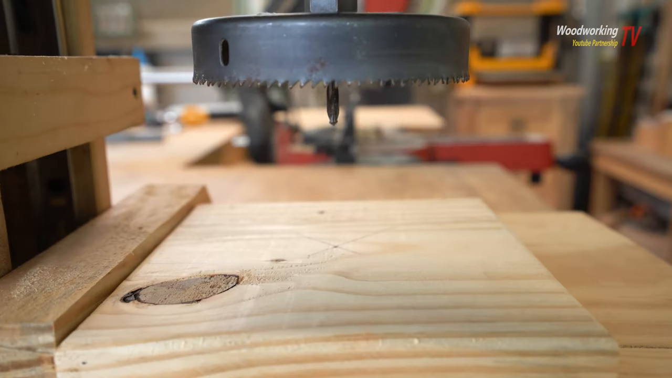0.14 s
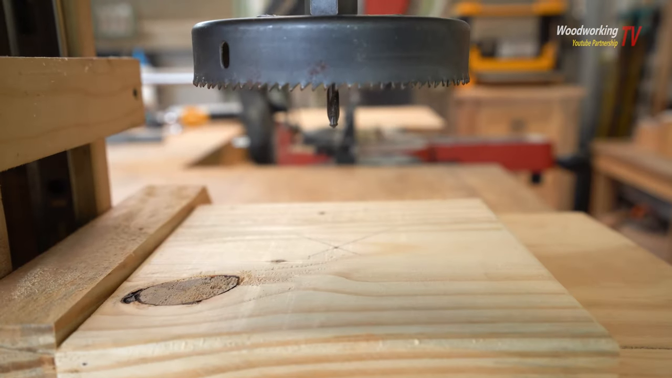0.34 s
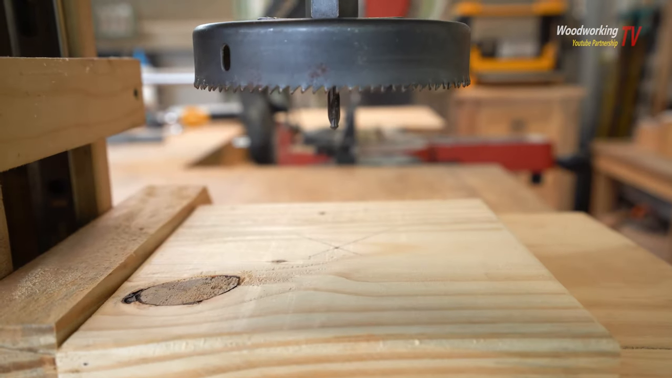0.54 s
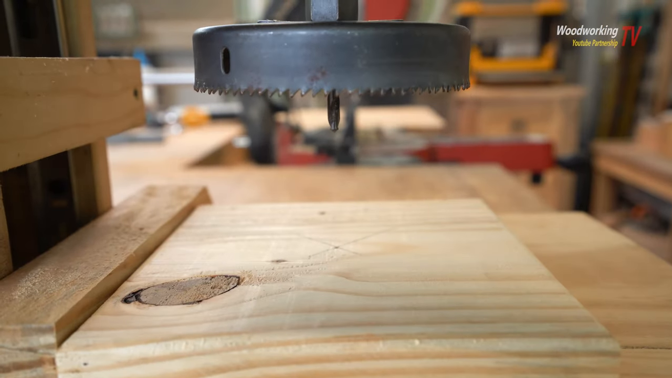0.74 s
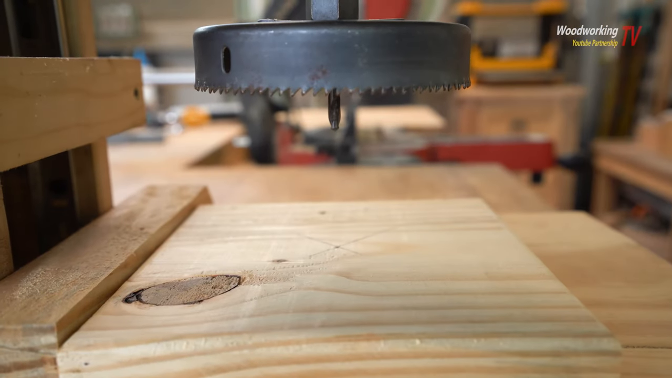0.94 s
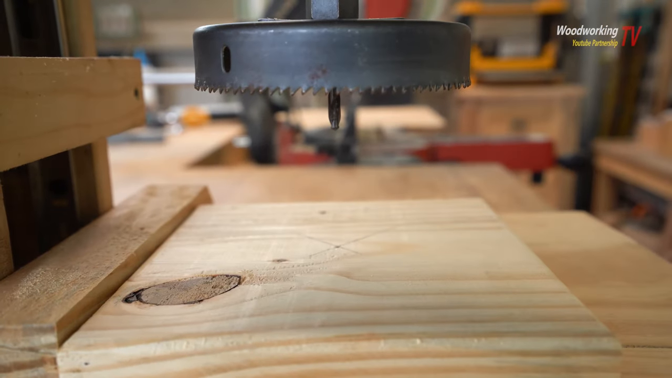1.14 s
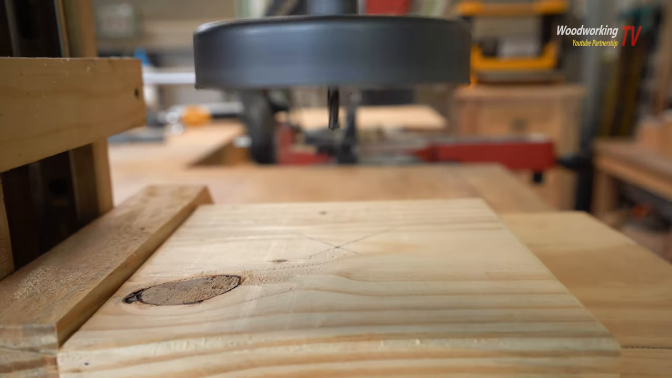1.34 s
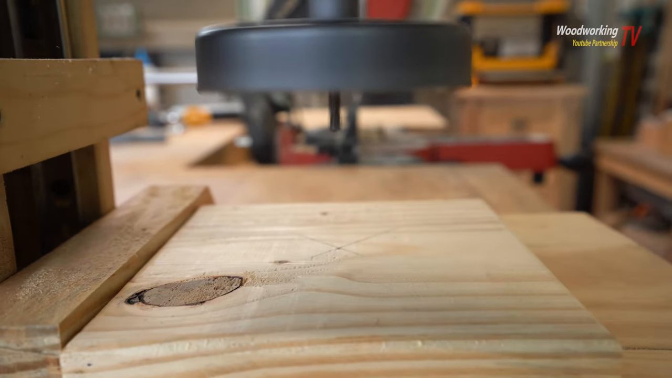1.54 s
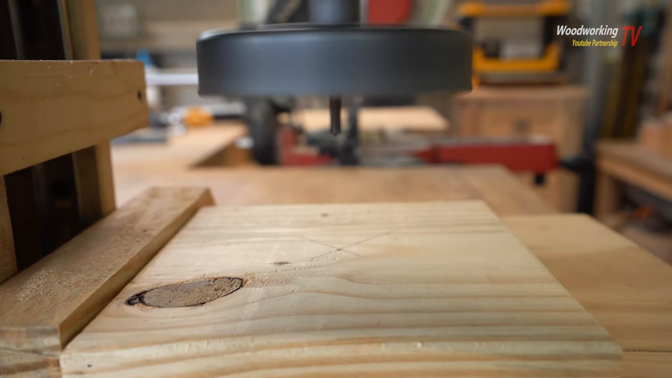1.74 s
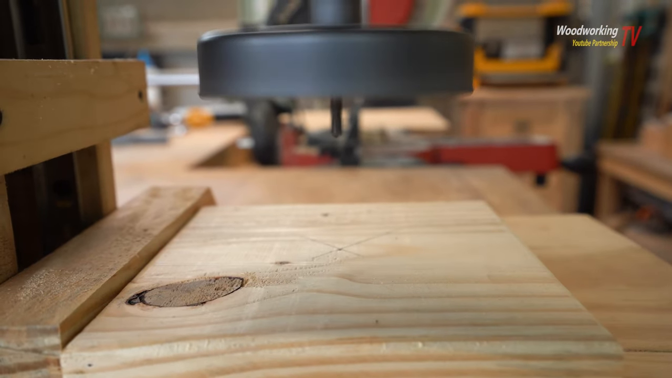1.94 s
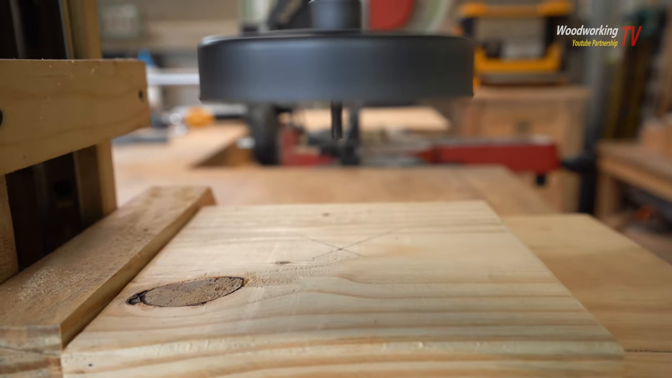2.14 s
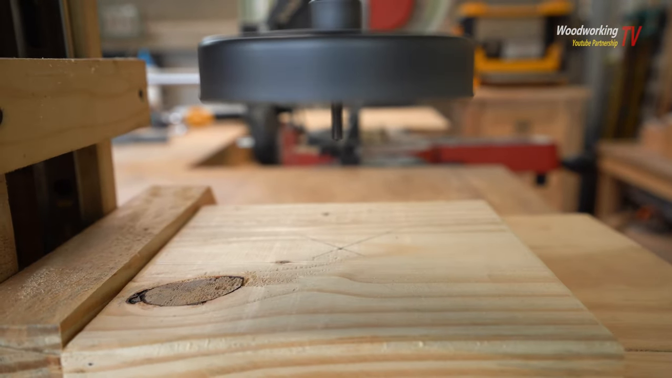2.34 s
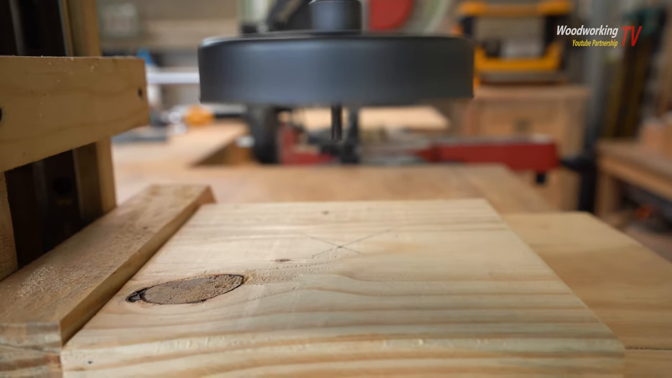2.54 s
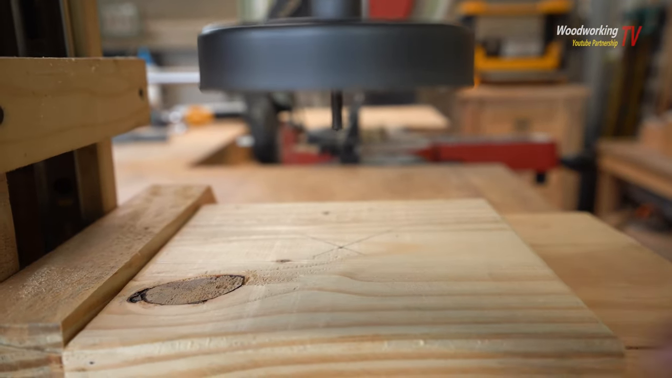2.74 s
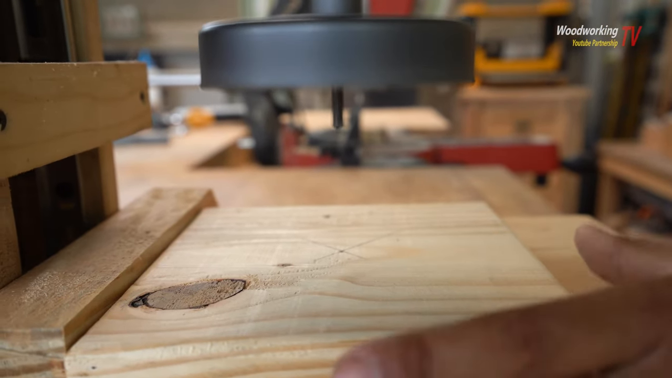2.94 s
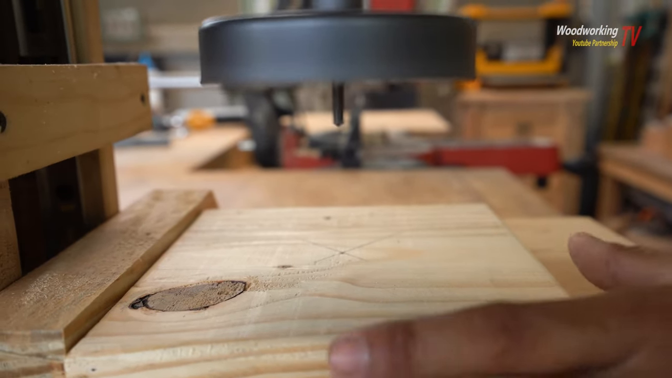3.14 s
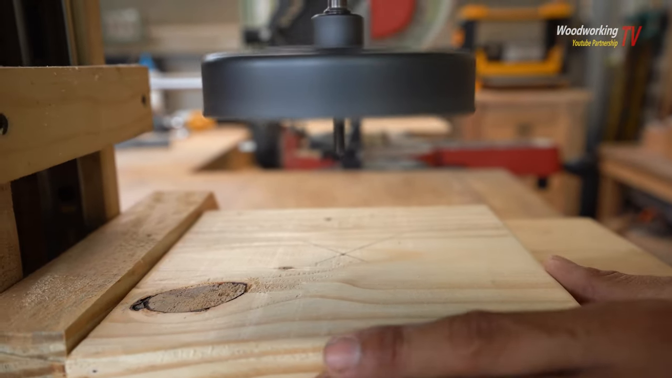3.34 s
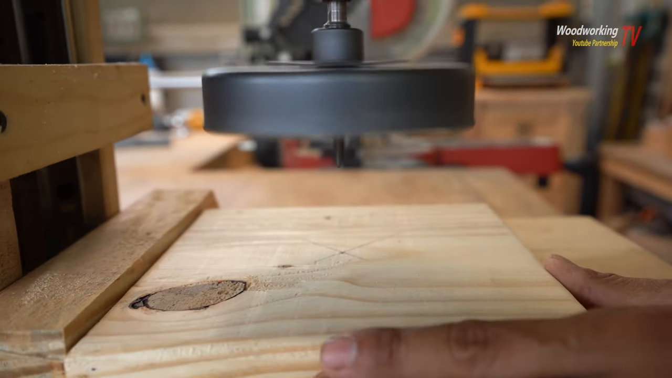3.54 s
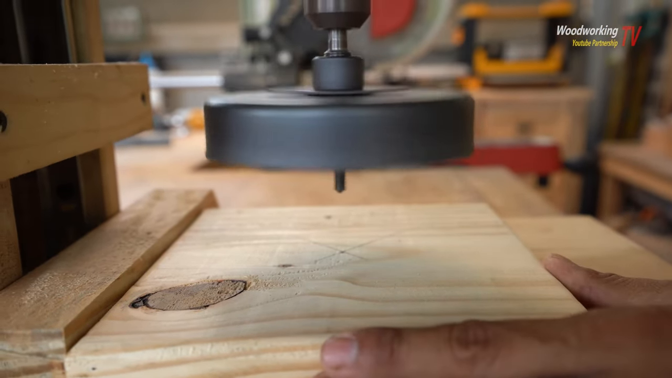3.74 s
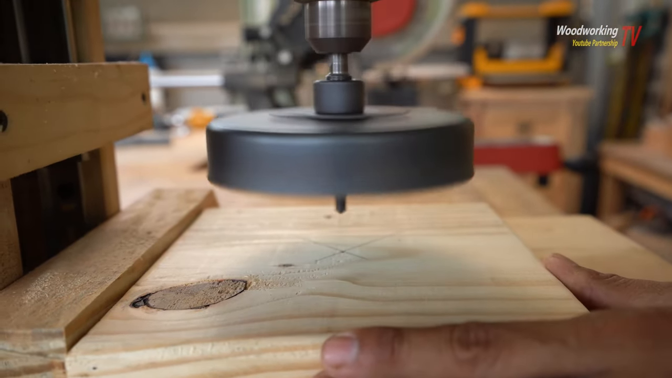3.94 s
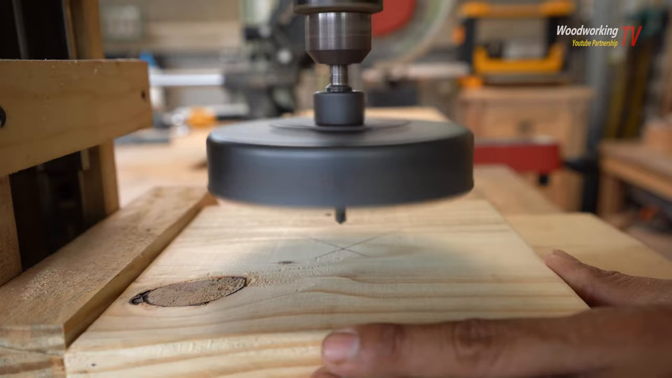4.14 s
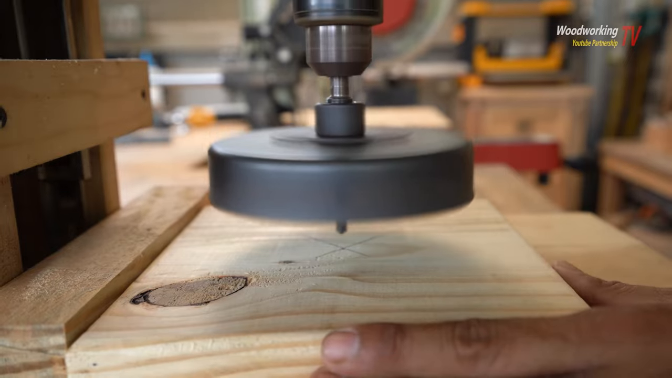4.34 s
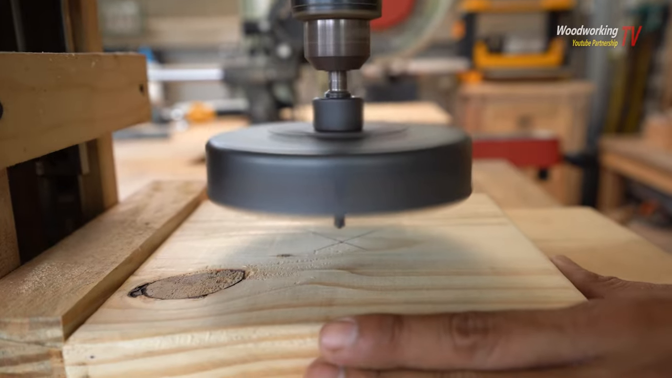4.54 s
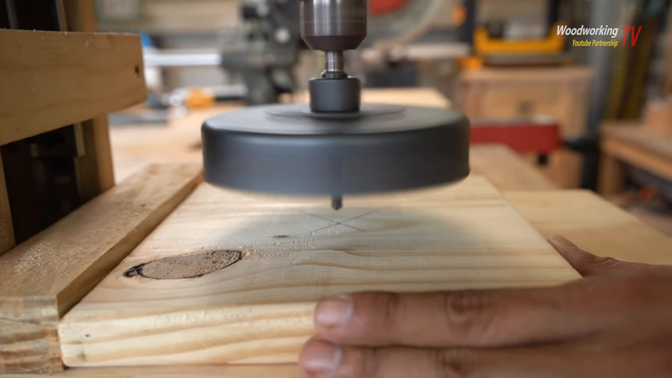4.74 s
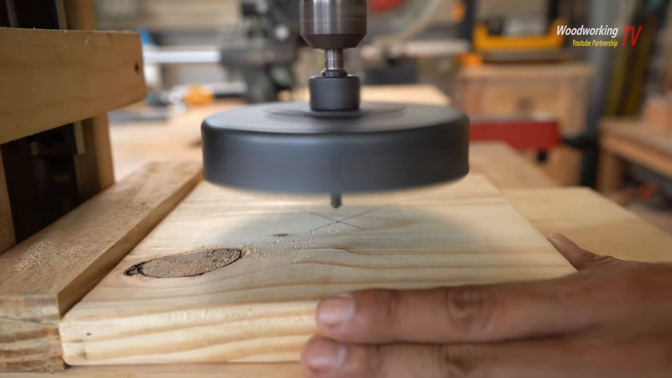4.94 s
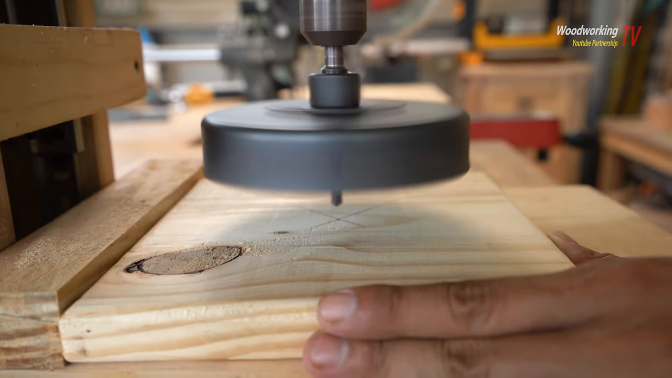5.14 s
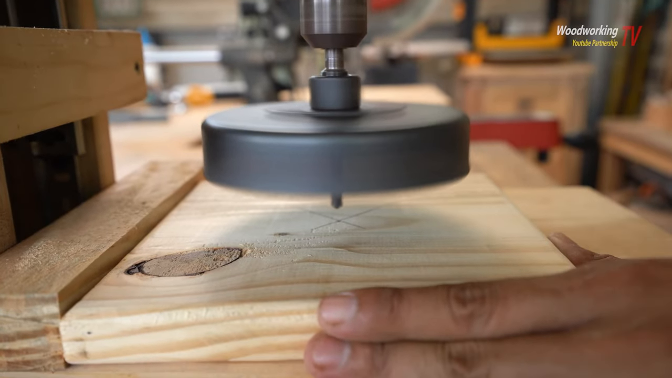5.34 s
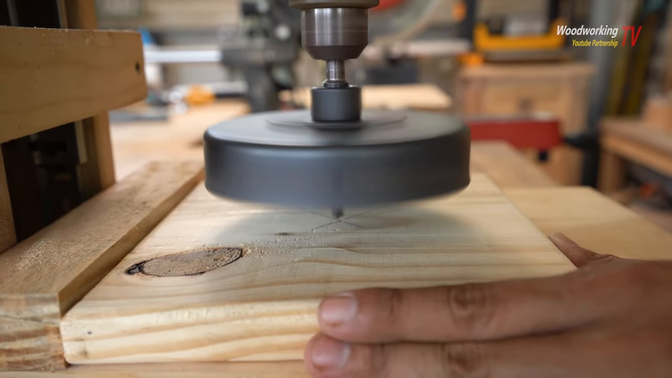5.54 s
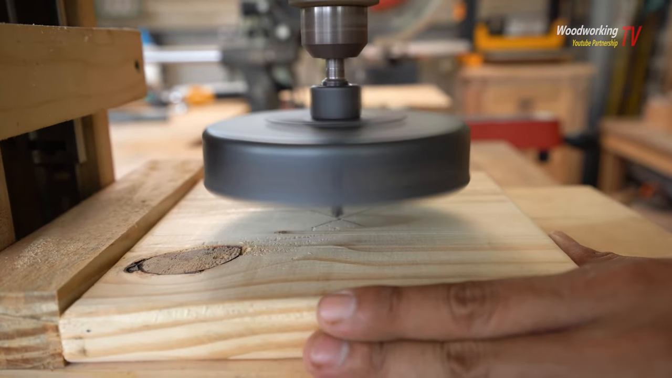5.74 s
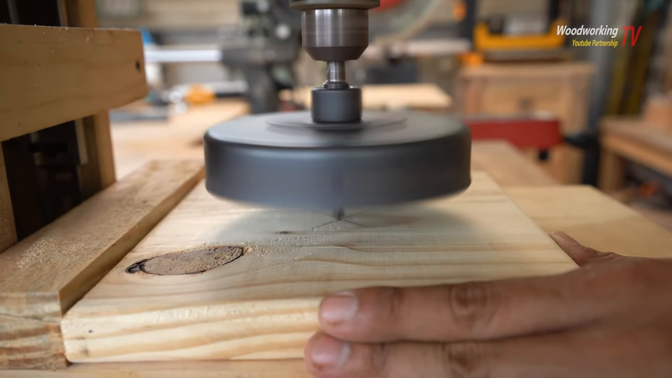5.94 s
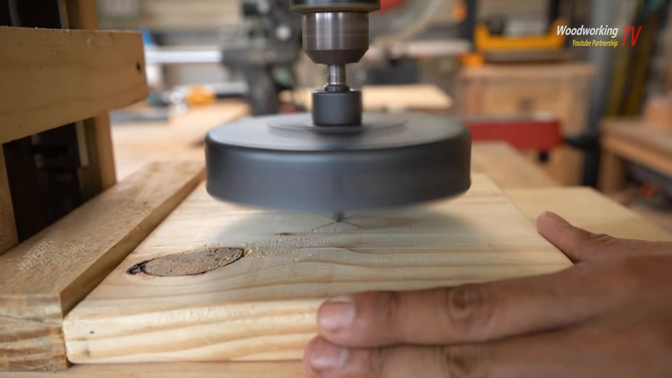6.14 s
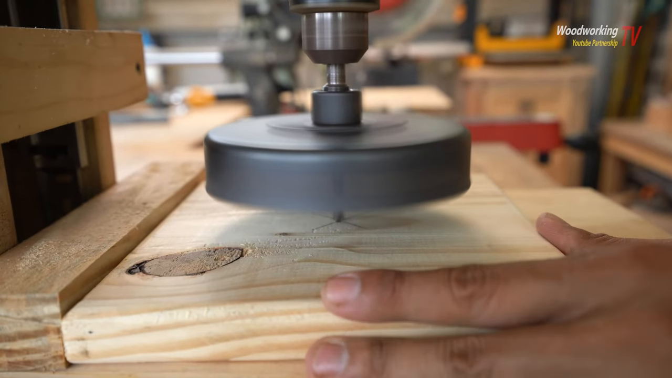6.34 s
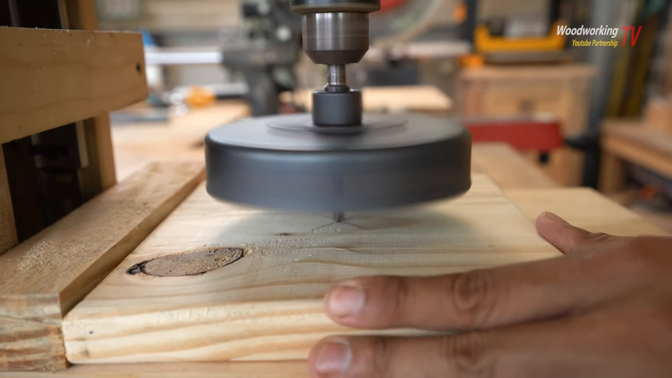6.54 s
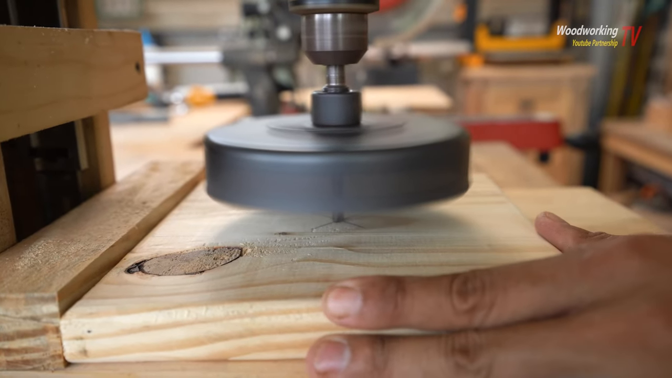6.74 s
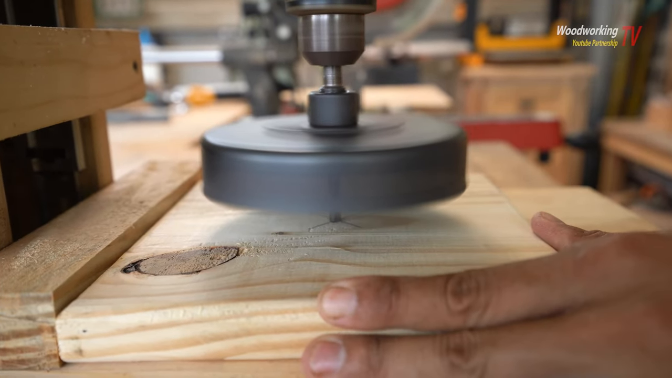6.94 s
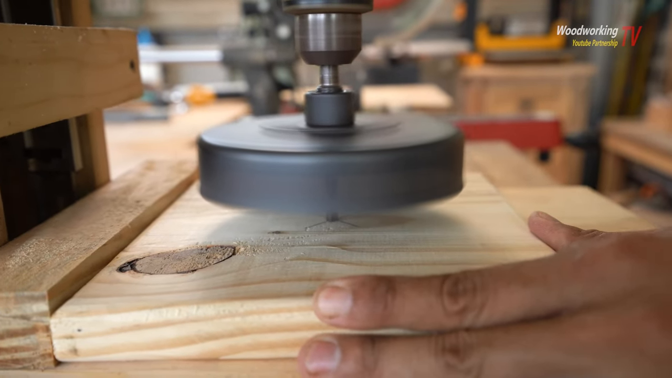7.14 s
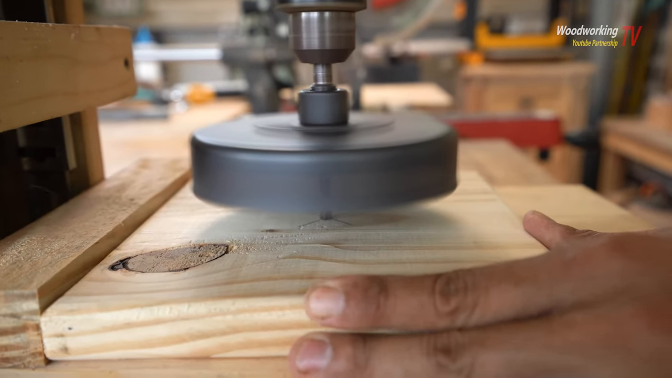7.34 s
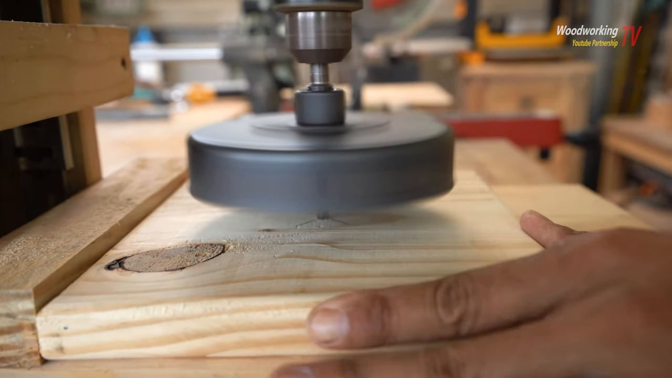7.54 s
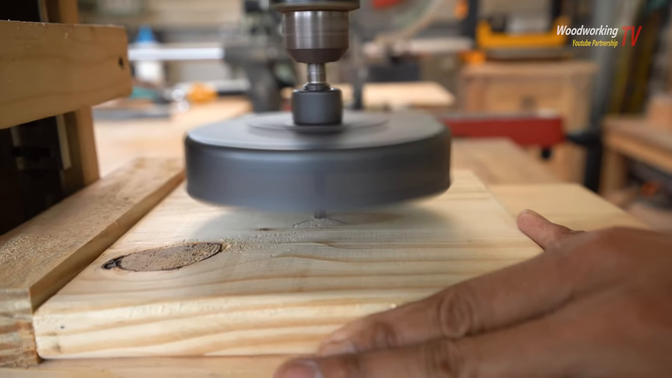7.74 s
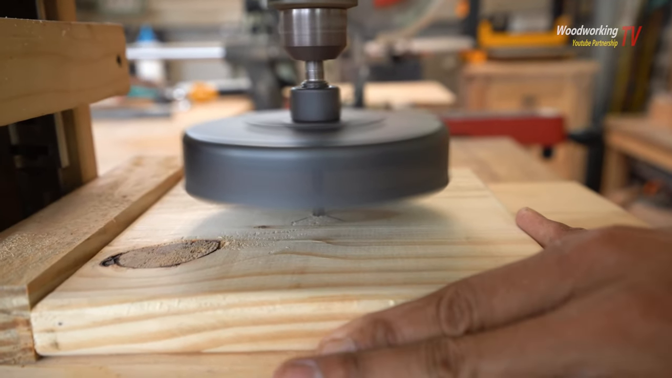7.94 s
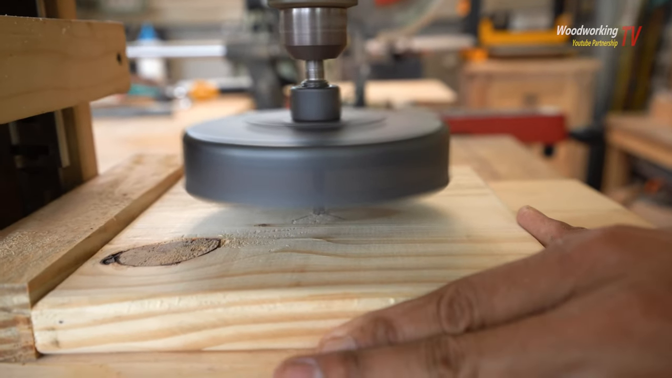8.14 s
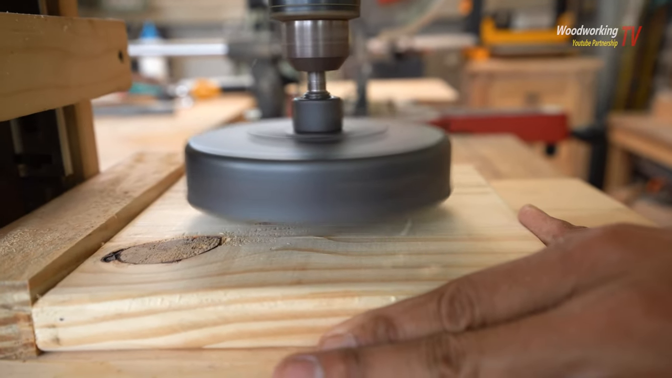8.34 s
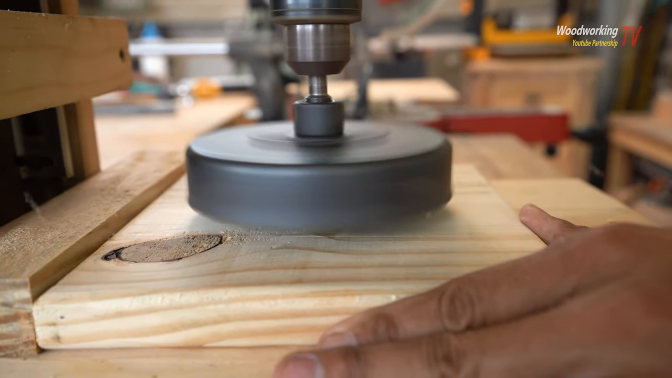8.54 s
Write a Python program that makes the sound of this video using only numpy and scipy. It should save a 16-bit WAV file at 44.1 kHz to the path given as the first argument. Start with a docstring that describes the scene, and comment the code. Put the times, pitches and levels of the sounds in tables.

```python
"""In a humming workshop, close to a corded drill in a stand: the lever knocks, the switch clicks, the motor runs up.
The armature whine is a set of sines on one speed curve; slapping gear teeth are bursts of their mesh tone;
fan, brushes and vents are shaped noise. Then the pilot bit bites the board in thuds and rasping chips,
the teeth lock into a tone and the speed sags. Scattered reflections spread it all between two microphones."""
import sys
import numpy as np
from scipy import signal
from scipy.fft import rfft, irfft, next_fast_len
from scipy.io import wavfile
from scipy.ndimage import uniform_filter1d, map_coordinates

SR = 44100
rng = np.random.default_rng(int(sys.argv[2]) if len(sys.argv) > 2 else 0)


def inscribe(sig):
    """Save sig as 16-bit PCM at rate SR to the path in sys.argv[1].

    A 1-D sig is mono; a 2-D sig holds one channel per row.
    Samples are clipped to [-1, 1] before scaling.
    """
    pcm = np.round(np.clip(np.atleast_2d(sig).T, -1, 1) * 32767)
    wavfile.write(sys.argv[1], SR, pcm.astype(np.int16))


N = 382347
T = np.arange(N) / SR

# How the drive sounds as it runs: t/s, whine level/dB, relative gear rattle level/dB, mesh tone level/dB,
# torque holding the teeth together (0-1), hard slaps per gear turn (about)
DRIVE = [(1.335, -58, -54, -54, .65, 1.5), (1.38, -52, -25, -28, .68, 1.63),
         (1.42, -74, -41, -37, 0.95, 1.4), (1.47, -70, -27, -37, 0.7, 1.3),
         (1.56, -58, -20.5, -25, 0.7, 1.47), (1.7, -51, -24.5, -31, 0.78, 1.15),
         (1.92, -46.5, -24.5, -26.5, 0.76, .9), (2.25, -38, -33, -35, 0.66, 0.43),
         (2.6, -36.5, -33.5, -33.5, 0.27, 0.32), (3.5, -37, -35, -37, 0, .3),
         (4.0, -31.5, -36, -48, 0.46, 0.31), (5.0, -34, -36.5, -48, .3, 0.29),
         (5.5, -32.5, -35, -48, 0.43, 0.33), (6.2, -36, -33.5, -37, 0.65, 0.35),
         (6.6, -35, -34.5, -39, 0.4, .44), (6.68, -43.5, -29, -35, 0.71, .65),
         (7.0, -44, -30.5, -34, 0.55, 0.69), (7.45, -42, -27, -31, 0.74, 0.86),
         (7.9, -42, -30.5, -33, .7, .75), (8.27, -39, -26.5, -34, 0.8, 0.73),
         (8.3, -45, -24, -23.5, 0.96, 2.0), (8.67, -46, -21, -23.5, 0.94, 2.4)]
# Spectrum of the shaken saw cup: f/Hz, relative level/dB per Hz
SCRAPE = [(2800, -36), (3400, -3), (3900, 3), (4500, 2), (5200, -34)]

GEAR_RATIO = 37 / 4  # whine turns per gear turn
ON_S, BITE_S, BOG_S = 1.333, 6.8, 8.3  # switch-on, the bit digs in, the motor bogs down


def amp(db):
    """Amplitude factor of a level in dB."""
    return 10 ** (np.asarray(db) / 20)


def unit(x):
    """Scales to rms 1."""
    return x / np.sqrt(np.mean(x ** 2) + 1e-20)


def along(points, hz):
    """Reads (Hz, value) points on a log frequency axis."""
    f, v = np.transpose(points)
    return np.interp(np.log(hz + 1), np.log(f + 1), v)


def curves(rows, before=-120):
    """One value per sample for each column after the time."""
    s, *cols = np.transpose(rows)
    return [np.interp(T, s, c, left=before) for c in cols]


def ramp(from_s, length_s):
    """Rises from 0 to 1."""
    return np.clip((T - from_s) / length_s, 0, 1)


def wobble(rate):
    """A smooth random curve, rate knots a second."""
    knots = rng.standard_normal(int(N * rate / SR) + 4)
    return map_coordinates(knots, [T * rate])


def filtered(x, response):
    """Filters x by a complex response of frequency."""
    m = next_fast_len(N + SR // 2)
    return irfft(rfft(x, m) * response(np.fft.rfftfreq(m, 1 / SR)), m)[..., :N]


def coloured(x, spectrum):
    """Shapes x with a spectrum and scales it to rms 1."""
    return unit(filtered(x, lambda hz: amp(along(spectrum, hz))))


def noise(spectrum, patchy_db):
    """Noise of rms 1 with patches of random gain in time and frequency."""
    z = signal.stft(rng.standard_normal(N), nperseg=256)[2]
    field = uniform_filter1d(rng.standard_normal(z.shape), 4, 0)
    field = uniform_filter1d(field, 8, 1)
    patched = signal.istft(z * amp(patchy_db * unit(field)), nperseg=256)[1][:N]
    return coloured(patched, spectrum)


def tone(turns, blur):
    """A sine of rms 1 whose phase wanders by blur radians."""
    return np.sqrt(2) * np.sin(2 * np.pi * turns + blur * wobble(40))


def speed():
    """Whine pitch in Hz: a straight climb, a slow settling, less what heat and load take."""
    # Heat, then load, slow the motor: t/s, whine lost f/Hz
    sag = [(1.3, 0), (3.1, 0), (4.0, 4.4), (5.0, 10.7), (6.5, 18.8), (7.05, 32.3), (7.5, 46.2), (7.7, 48.5),
           (8.1, 50.2), (8.26, 62), (8.34, 81.7), (8.4, 93), (8.67, 128.5)]
    kick_hz, climb_hz_per_s = 217, 1800  # whine just after switch-on, first climb
    free_hz, settle_hz, settle_s = 936, 544, .34  # unloaded whine, start of the settling below it, time constant
    t = T - ON_S
    climb = kick_hz + climb_hz_per_s * t
    settling = free_hz - settle_hz * np.exp(-t / settle_s)
    return (t > 0) * (np.minimum(climb, settling) - curves(sag, before=0)[0])


def locked():
    """How firmly the gear teeth are locked, 0-1, with short fades."""
    # The teeth lock: from t/s, to t/s, depth (0-1)
    lock_spans = [(6.9, 6.98, .3), (7.15, 7.24, .3), (7.31, 7.48, 1.0), (8.11, 8.29, 1.0)]
    edge_s = .03
    return sum(depth * (ramp(t0, edge_s) - ramp(t1 - edge_s, edge_s)) for t0, t1, depth in lock_spans)


def housing(hz):
    """Gain of the housing resonances at a moving pitch; silent at rest."""
    # Broad resonances the orders sweep through: f/Hz, half width to 1/e of the dB/Hz, peak gain/dB
    resonances = [(4250, 1760, 23), (8800, 1300, 12)]
    gain_db = sum(db * np.exp(-((hz - c) / w) ** 2) for c, w, db in resonances)
    return (hz > 0) * amp(gain_db)


def motor(turns):
    """Armature orders over fan roar, brush hiss and the whistle of the vents."""
    # Broadband layers: t/s, brush hiss level/dB, vent whistle level/dB, fan level/dB
    roar = [(1.33, -33, -40, -29), (1.35, -22, -32, -20), (1.39, -24.5, -27, -19), (1.44, -24.5, -27, -26),
            (1.55, -24, -23, -30), (1.78, -24.5, -20, -30), (2.11, -25, -21.5, -30),
            (2.84, -25, -21, -30.5), (6.77, -26, -21.5, -30), (7.4, -26.5, -23.5, -31),
            (7.97, -25.5, -22, -30), (8.28, -27, -24, -31), (8.67, -26.5, -26, -30.5)]
    # Whine orders: multiple of the whine, relative idling level/dB, relative run-up level/dB
    orders = [(2, -49, -66), (3, -43.5, -41), (5, -44.5, -39), (6, -45, -54), (7, -48, -34), (9, -48, -42),
              (13, -39, -50), (14, -37, -50)]
    # Gain of the orders as the motor works: t/s, idling orders/dB, run-up orders/dB
    strain = [(1.42, -22, -8), (1.5, -20, 2.5), (1.6, -11, -5), (1.9, -2, -5), (2.3, 1, -21), (6.5, 3, -34),
              (6.8, 1, -30), (8.67, -11, -22)]
    # Field pull shifts the whine: offset above it f/Hz, relative level/dB
    mains_sides = [(199, -53.5), (398, -53)]
    # Brush hiss: f/Hz, relative level/dB per Hz
    hiss_spectrum = [(2530, -44), (4300, -3), (4770, 0), (6040, -4.5), (7010, -0.5), (7620, -5),
                     (8320, 1.5), (10700, -1), (13900, -32), (22000, -120)]
    # Fan roar: f/Hz, relative level/dB per Hz
    fan_spectrum = [(59, -77), (100, -46), (813, -23.5), (882, -16), (926, -12), (1040, -14), (1110, -10.5),
                    (1730, -12.5), (1840, -9), (2510, -1.5), (3160, -7), (3720, -1.5), (4180, -5),
                    (5000, -24), (6500, -12.5), (11000, -120)]
    # Vent whistle at first: f/Hz, relative level/dB per Hz
    vent_early = [(6120, -37.5), (10400, -14), (11700, 4.5), (12900, -0.5), (13600, 4), (15100, 0),
                  (15900, -4)]
    # Vent whistle after a few seconds: f/Hz, relative level/dB per Hz
    vent_late = [(6100, -38.5), (10400, -6.5), (11200, -3), (11900, 0.5), (12600, -2), (13000, 2.5),
                 (13900, 1), (14500, -3), (15200, 0.5), (15900, -8.5)]
    lock_whine_db, commutator_db = -13, -45.5  # whine change at full lock; commutator before the housing gain

    whine_db = curves(DRIVE)[0] + lock_whine_db * locked()
    hiss_db, vent_db, fan_db = curves(roar)
    idle_db, surge_db = curves(strain)
    out = amp(whine_db + 0.59 * wobble(15)) * tone(turns, 0.056)
    sides = sum(amp(db + wobble(13)) * tone(turns + hz * T, 0.18) for hz, db in mains_sides)
    out += amp(idle_db) * sides

    commutator_gain = housing(12 * speed()) * amp(commutator_db + 2 * wobble(5) + 3 * wobble(150))
    out += commutator_gain * (tone(12 * turns, 3) + wobble(500) * tone(12 * turns, 1))
    for k, db, run_db in orders:
        # arcing brushes blur the orders in the run-up
        flutter = np.sqrt(housing(k * speed())) * amp(surge_db + run_db) * wobble(450)
        steady = amp(idle_db + db + 2.8 * wobble(45))
        out += (steady + flutter) * tone(k * turns, 0.8 + .1 * k)

    sparks = amp(1.13 * wobble(300) + 0.27 * wobble(7.4))
    late = ramp(3.66, 1.5)  # the vent noise slowly changes colour, fuller near 10.4 and 13 kHz
    vent = np.sqrt(1 - late) * noise(vent_early, patchy_db=0)
    vent += np.sqrt(late) * noise(vent_late, patchy_db=0.5)
    hiss = amp(hiss_db) * noise(hiss_spectrum, patchy_db=1) + amp(vent_db) * vent
    return out + sparks * hiss + amp(fan_db) * noise(fan_spectrum, patchy_db=1.5)


def slaps(gear, grip, per_turn, width, soft_db):
    """Complex tooth-slap envelope: backlash builds until a hard slap spends it; soft slaps fill the rest."""
    k = np.floor(2 * gear).astype(int)  # one slot each half turn
    draw = rng.standard_normal((k[-1] + 1, 4))
    first = np.searchsorted(k, np.arange(len(draw)))
    backlash = np.cumsum(per_turn[first] / 2 * amp(6 * draw[:, 3] - 2))
    hard = np.diff(np.floor(backlash), prepend=0)[k] > 0
    draw, slack = draw[k], 1 - np.clip(grip, 0, 1)
    centre = .5 + np.clip(0.22 * slack * draw[:, 0], -.25, .25)
    size = amp(np.where(hard, 1.8 * draw[:, 1], soft_db + 5 * draw[:, 1]))
    env = size * np.exp(-((2 * gear - k - centre) / width) ** 2)
    env = env * np.exp(4j * slack * draw[:, 2])  # loose teeth scatter the phase
    # even out the level over a sixth of a second
    power = uniform_filter1d(np.abs(env) ** 2, size=SR // 6)
    return env / np.sqrt(np.abs(power) + 1e-9)


def gearbox(turns):
    """Teeth mesh at four times the whine; each slap is a short burst of that tone and rings the saw cup."""
    # Modes of the saw cup: f/Hz, width f/Hz, level added to the direct sound/dB
    cup_modes = [(3660, 45, 3), (3870, 30, 12), (3800, 550, 3)]
    # High ring of the gear case: f/Hz, relative level/dB per Hz
    case_spectrum = [(9300, -33), (9800, 14), (10400, 6), (11000, -37)]
    lock_rattle_db, lock_over_db = -6, 8  # changes at full lock
    over_db, over_load_db = -39, 6.5  # mesh overtone gain idling, its rise under load
    bog_sides_db = -41  # one whine above and below the mesh tone
    jolt_db, jolt_t60_s = -20, 1  # the starting jolt shakes the cup

    _, rattle_db, mesh_db = curves(DRIVE)[:3]
    grip, per_turn = curves(DRIVE, before=0.97)[3:]
    gear = turns / GEAR_RATIO
    rattle_db = rattle_db + lock_rattle_db * locked()
    loaded = ramp(BITE_S - .1, .3)
    slack = 1 - np.clip(grip, 0, 1)
    mesh = np.exp(8j * np.pi * turns)

    width = .2 - .06 * loaded + .2 * grip ** 8
    bursts = (slaps(gear, grip, per_turn, width=width, soft_db=-18) * mesh).real
    rattle = amp(rattle_db + 1.5 * wobble(6)) * bursts

    def cup(f):
        """Direct sound plus the resonances of the saw cup."""
        return 1 + sum(amp(db) * 1j * f * w / (c * c - f * f + 1j * f * w) for c, w, db in cup_modes)

    tight = slaps(gear, grip, np.ones(N), width=0.17, soft_db=-10)
    over = np.sqrt(2) * (tight * mesh ** 2).real
    # the case rings only once the bit pushes back
    case_ring = amp(-7) * np.abs(tight) * noise(case_spectrum, patchy_db=3)
    over += loaded * (amp(-3) * (tight * mesh ** 4).real + case_ring)
    over *= (T > ON_S) * amp(over_db + over_load_db * loaded + lock_over_db * locked() + 1.5 * wobble(8))

    mesh_tone = amp(mesh_db + 3 * slack * wobble(30)) * tone(4 * turns, 2.5 * slack)
    sides = sum(amp(bog_sides_db + 2.5 * wobble(30)) * tone(k * turns, 0.37) for k in (3, 5))
    mesh_tone += ramp(BOG_S, .02) * sides

    jolt_fade = amp(jolt_db - 60 * np.abs(T - ON_S) / jolt_t60_s)
    jolt = ramp(ON_S, 0.025) * jolt_fade * noise(SCRAPE, patchy_db=3)
    return filtered(rattle, cup) + mesh_tone + over + jolt


def singing():
    """Now and then one line near the mesh tone holds steady for a moment, gliding slightly."""
    # Steady ringing: from t/s, to t/s, first f/Hz, last f/Hz, level/dB
    lines = [(1.459, 1.533, 3610, 3680, -27), (2.003, 2.55, 3870, 3840, -34),
             (7.31, 7.507, 3680, 3665, -24.5), (8.292, 8.627, 3694, 3585, -27.5)]
    out = 0
    for t0, t1, hz0, hz1, db in lines:
        edge = np.clip(np.minimum(T - t0, t1 - T) / 0.0089, 0, 1)
        cycles = np.cumsum(np.interp(T, [t0, t1], [hz0, hz1])) / SR
        out = out + amp(db + 2 * wobble(30)) * edge * tone(cycles, 0.41)
    return out


def pilot_bit(turns):
    """The bit thuds the board in step with the gear, chips rasp once a turn and the scrape shakes the cup."""
    # Pressure of the bit, as the level of its thud: t/s, level/dB
    pressure = [(5.97, -87), (6.03, -52.5), (6.18, -67), (6.6, -75), (6.66, -49), (6.69, -61), (6.72, -51),
                (6.94, -53.5), (7.02, -48), (7.11, -52.5), (7.3, -49), (7.33, -54), (7.41, -50.5),
                (7.5, -51.5), (7.96, -48.5), (8.28, -50.5), (8.67, -49.5)]
    # The board's answer to the thud: f/Hz, relative level/dB per Hz
    board = [(88, -50), (150, -7.5), (468, 1.5), (571, -1), (748, -3), (820, -1), (1070, -61), (1800, -120)]
    # Rasp of the chips: f/Hz, relative level/dB per Hz
    chips = [(410, -53), (700, -69), (745, -5.5), (1050, 8.5), (1180, -2.5), (1290, 6.5), (1900, -10.5),
             (2470, -42), (4180, -120)]
    scrape_db, rasp_db = 18.5, 12.5  # over the thud
    rasp_grow_db, rasp_bog_db = 3.5, -5.5  # chips thicken as the hole deepens, thin out as the motor bogs

    thud_db, = curves(pressure)
    rasp_db = thud_db + rasp_db + rasp_grow_db * ramp(BITE_S, 1.1) + rasp_bog_db * ramp(BOG_S, 0.18)
    gear = turns / GEAR_RATIO
    bites = np.diff(np.floor(gear), prepend=0) * amp(0.38 * wobble(91))
    gate = (.5 + .5 * np.cos(2 * np.pi * gear)) ** 2
    crumble = coloured((gate + 1.8) * rng.standard_normal(N), chips)
    rasp = unit(coloured(bites, chips) + .9 * crumble)
    scrape = amp(thud_db + scrape_db) * noise(SCRAPE, patchy_db=3)
    # harmonics of the gear turn, weighted by the board as if at 96 turns a second
    thud = sum(amp(along(board, k * 96) + 4 * wobble(5)) * tone(k * gear, .15) for k in range(2, 9))
    thud = unit(unit(thud) + 0.3 * noise(board, patchy_db=4))
    return amp(thud_db) * thud + amp(rasp_db) * rasp + scrape


def knocks():
    """Lever and switch contacts: the stand's modes, one more favoured, with a rattling tail."""
    # Contacts: t/s, relative level/dB, main f/Hz, relative treble level/dB, decay scale t/s
    contacts = [(0.139, -30, 2620, -10, 0.1), (0.16, -37, 1610, -7, 0.083), (0.472, -7, 1937, -15, 0.087),
                (0.609, -12.5, 1000, -6, 0.1), (0.837, -36.5, 510, -7, 0.15),
                (1.113, -29.5, 1120, -22, 0.1), (1.249, -25, 1590, -27, 0.088),
                (1.271, -23.5, 1036, -31, 0.11), (1.28, -24, 1087, -29, 0.085),
                (1.335, -10.5, 2360, -12, 0.24)]
    # Modes of the stand: f/Hz, relative level/dB
    stand = [(533, -7), (1000, -4.5), (1459, 0), (1906, -13), (2250, -2), (2589, -2.5)]
    out, t = np.zeros(N + SR), T[:SR // 3]
    clack = noise([(300, -38), (600, 0), (2000, 7), (3500, -7), (7000, -22)], patchy_db=0.5)
    for s, db, hz, treble_db, decay_s in contacts:
        start = round(s * SR)
        ring = 1.04 * clack[start:][:len(t)]
        for f, level in stand + [(hz, 3)]:
            jitter = 0.07 * np.cumsum(rng.standard_normal(len(t)))
            ring += amp(level + rng.normal(0, 1.4)) * np.sin(2 * np.pi * f * t + jitter)
        fizz = rng.standard_normal(len(t)) * amp(treble_db + 16.0 - 60 * t / 0.16)
        # a long and a short decay together
        tail = 0.58 * amp(-60 * t / (2.9 * decay_s)) + amp(-60 * t / (.5 * decay_s))
        attack = 1 - np.exp(-t / 0.00049)
        out[start:][:len(t)] += amp(db - 20) * (ring * tail + fizz) * attack
    return filtered(out[:N], lambda hz: hz ** 2 / (hz ** 2 + 300 ** 2))  # thins out the bass


def workshop():
    """Mains hum of the lamps over distant air noise, and a brief scrape of the lever."""
    # Level of the room tone, lower once the drill runs; only the change from the first row counts: t/s, level/dB
    shop = [(0.0, -46), (0.37, -49), (1.0, -49.5), (1.38, -49), (1.55, -53.5), (1.86, -61), (2.2, -72),
            (8.67, -59)]
    # Distant air noise: f/Hz, relative level/dB per Hz
    air = [(94, -62), (160, -18), (190, -21), (254, -17.5), (296, -7.5), (403, -9), (444, -10), (498, -1),
           (806, -14), (853, -12.5), (1640, -6.5), (2320, -11.5), (3280, -11.5), (3760, -14.5),
           (15900, -27.5)]
    # Hum lines: f/Hz, level at the start/dB
    hum_lines = [(199.2, -63.5), (301.5, -58.5), (398.4, -61), (495.3, -57), (597.5, -65), (710.6, -63),
                 (796.7, -63), (1104, -60.5), (1400, -74), (1620, -57.5), (1744, -59), (2600, -58),
                 (2799, -63), (3198, -54.5), (3596, -59), (3994, -62), (4398, -65)]
    shop_db = curves(shop)[0]
    hum = sum(amp(db + wobble(2.6)) * tone(hz * T, 0.11) for hz, db in hum_lines)
    air_noise = amp(-42.5 + wobble(26)) * noise(air, patchy_db=1.5)
    swell = np.exp(-((T - .17) / 0.035) ** 2)
    scrape = amp(-44.5) * swell * noise([(1500, -22), (5000, 2), (15000, -16)], patchy_db=8)
    return amp(shop_db - shop_db[0]) * (hum + air_noise) + scrape


def scene():
    """The walls return a scattered copy that adds at one microphone and subtracts at the other."""
    # Left-right likeness: f/Hz, likeness (0-1)
    alike = [(60, .998), (500, .995), (1000, .96), (2400, .8), (4000, .66), (6000, .6), (15000, .6)]
    # Left-right balance: f/Hz, left over right level/dB
    balance = [(60, 0.0), (120, 0.0), (240, 0.0), (480, 0.0), (950, 0.0), (1890, -0.5), (3770, -2.0),
               (7520, 0.0), (15000, -3.0)]
    turns = np.cumsum(speed()) / SR
    dry = motor(turns) + gearbox(turns) + singing() + pilot_bit(turns) + knocks() + workshop()
    z = signal.stft(dry, nperseg=512)[2]
    drift = uniform_filter1d(rng.standard_normal(z.shape), size=8, axis=1)
    drift = uniform_filter1d(drift, size=3, axis=0)
    # the phase of the reflections drifts at random
    wet = signal.istft(z * np.exp(2.5j * unit(drift)), nperseg=512)[1][:N]

    def shares(hz):
        """Weights of direct and scattered sound that give the likeness."""
        angle = np.arccos(np.clip(along(alike, hz), 0, 1)) / 2
        return np.array([np.cos(angle), np.sin(angle)])

    mid, side = filtered(np.array([dry, wet]), shares)
    pair = np.array([mid + side, mid - side])
    return filtered(pair, lambda hz: amp(np.outer([.5, -.5], along(balance, hz))))


def record(dry):
    """The microphone chain keeps nothing from its band limit of 15750 Hz upwards."""
    return filtered(dry, lambda hz: hz < 15750)


dry = scene()
out = record(dry)
inscribe(out)
```